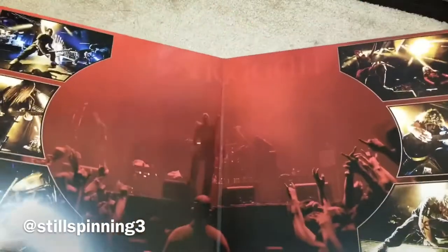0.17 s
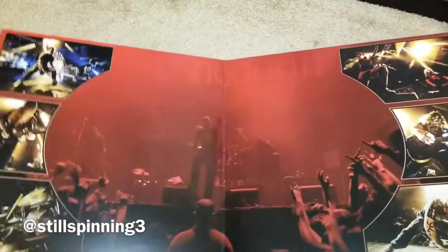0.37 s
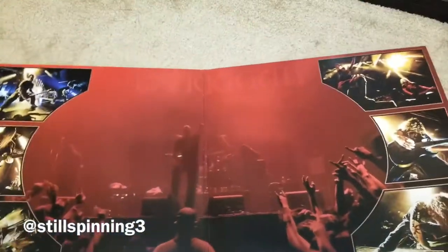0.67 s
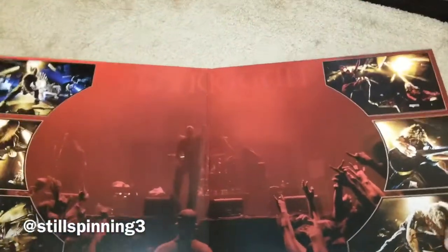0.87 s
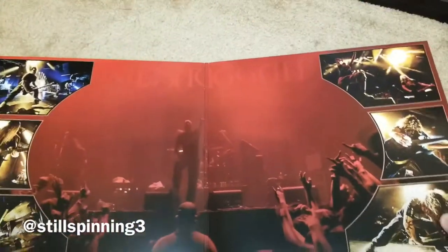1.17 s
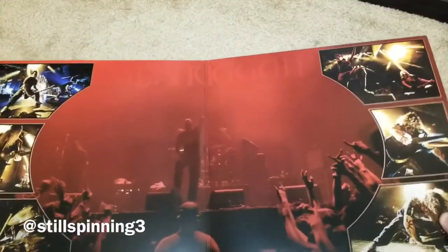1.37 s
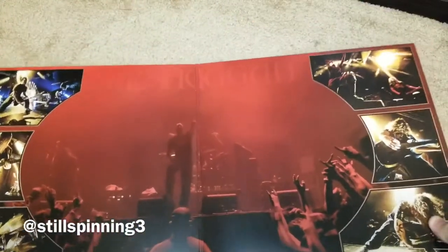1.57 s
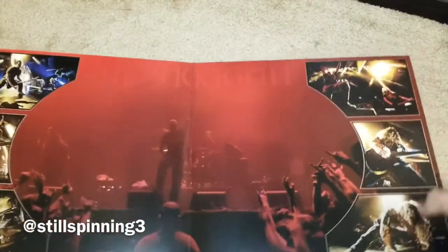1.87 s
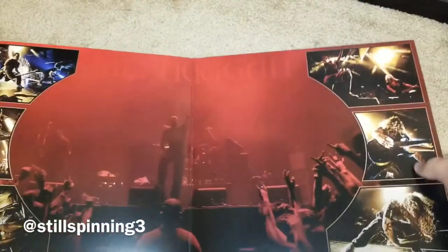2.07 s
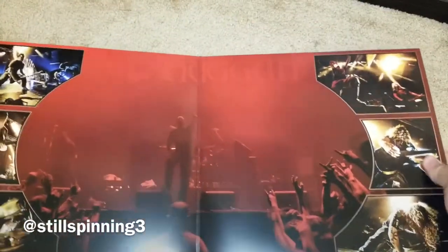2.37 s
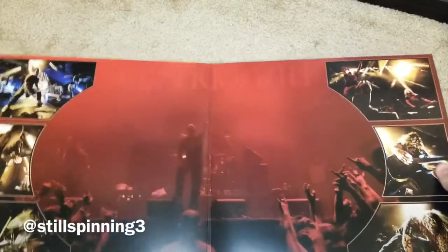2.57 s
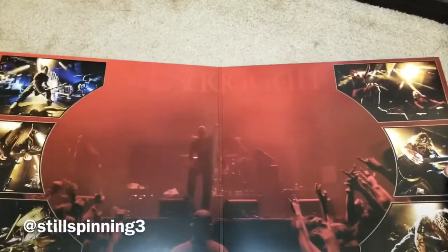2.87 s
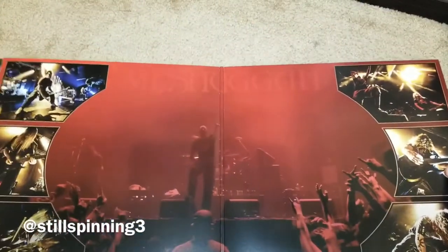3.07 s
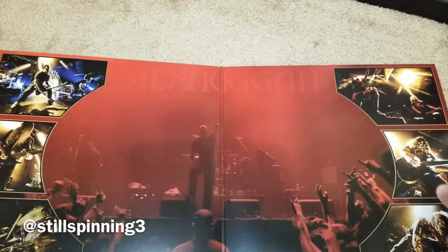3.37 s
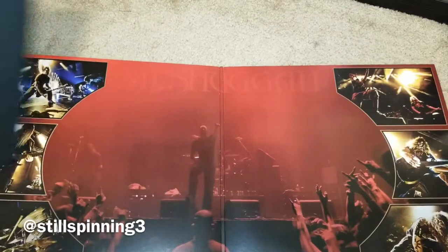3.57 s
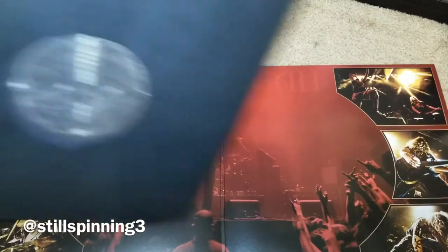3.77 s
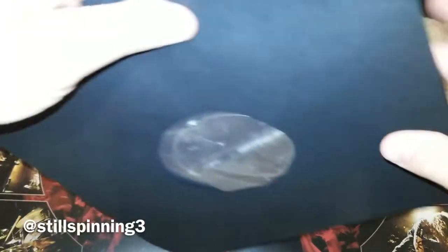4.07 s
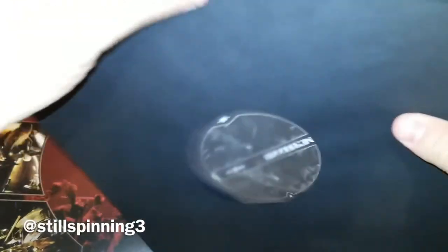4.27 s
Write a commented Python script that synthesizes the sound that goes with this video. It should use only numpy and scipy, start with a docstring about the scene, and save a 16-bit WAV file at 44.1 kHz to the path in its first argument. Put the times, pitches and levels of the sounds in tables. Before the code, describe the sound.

Close stereo sound of hands on stiff hollow card: brief dry strokes, low flexing thumps, small paper clicks. A sharp snap and knock come before the middle, then a stronger clustered knock and a breathy two-part paper slide. Things quieten to a faint room tone, with a few tiny taps, before a moderate rustle with light clicks ends it. Dry, small room.

```python
"""A cardboard gatefold jacket is handled on a carpet close to a stereo microphone in a quiet, damped room.
At first fingers stroke and knock the board (shaped noise, decaying sines), which flexes and thumps; paper snaps
(filtered noise bursts). The hardest knocks fall near 2.5 s; at 2.6-3.1 s a paper sleeve slides out (noise under a
level curve). Quieter touches follow; at 4.0-4.3 s the sleeve is turned, with more snaps and knocks.
Throughout, scrapes sing in the hollow jacket, the room answers snaps and knocks, and a faint room tone lasts."""
import sys
import numpy as np
from scipy import signal
from scipy.fft import rfft, irfft, next_fast_len
from scipy.io import wavfile
from scipy.ndimage import uniform_filter1d, map_coordinates

SR = 44100
rng = np.random.default_rng(int(sys.argv[2]) if len(sys.argv) > 2 else 0)


def voltage_ratio(decibels):
    """Convert decibels (scalar or array-like) to amplitude ratios, 20 dB per decade."""
    exponent = np.asarray(decibels, float) / 20
    return 10 ** exponent


def digitize_waveform(pressure):
    """Quantize a signal to 16-bit integers and store it at the path in sys.argv[1].

    Rows of a 2-D input are taken as channels; values are limited to [-1, 1].
    """
    field = np.atleast_2d(pressure).T
    bounded = np.clip(field, -1, 1)
    quanta = np.round(bounded * 32767).astype(np.int16)
    wavfile.write(sys.argv[1], SR, quanta)


N = 195495

# Lasting contact of paper and board. Each row: time in seconds, rubbing in dB, fine hiss in dB.
SLIDE_CURVE = [(0.0, -57, -58.5), (0.146, -58, -70), (0.192, -80, -98), (0.511, -58.5, -66),
               (0.665, -71.5, -74), (0.8, -57.5, -68.5), (1.127, -61.5, -63), (1.269, -69, -73.5),
               (1.56, -60.5, -71), (2.03, -76, -68.5), (2.41, -57.5, -61.5), (2.58, -56, -64),
               (2.63, -44.5, -48.5), (2.696, -40.5, -42.5), (2.83, -44.5, -46), (2.961, -39.5, -36),
               (3.111, -52, -52.5), (3.149, -64, -61.5), (3.35, -67.5, -71.5), (3.45, -91, -83.5),
               (3.78, -71.5, -67), (3.941, -70, -70), (4.091, -52, -54), (4.21, -49.5, -46),
               (4.288, -64, -65.5), (4.432, -64.5, -72.5)]
# Finger strokes. Each row: peak in seconds, rise in seconds, fall in seconds, rubbing in dB, fine hiss in dB.
FINGER_STROKES = [(0.346, 0.15, 0.11, -42, -47.5), (0.695, .02, 0.13, -68, -57),
                  (0.755, 0.078, 0.053, -49.5, -56.5), (0.866, .1, 0.13, -65, -57.5),
                  (0.912, .1, 0.079, -52, -56.5), (0.995, 0.02, 0.11, -55, -64),
                  (1.311, 0.035, 0.17, -61.5, -71), (1.447, 0.077, 0.067, -60, -63),
                  (1.612, 0.029, 0.067, -41, -54.5), (1.694, 0.068, 0.11, -51, -55),
                  (1.846, 0.1, 0.11, -52, -56), (1.957, 0.12, 0.14, -52.5, -60.5),
                  (2.07, 0.091, .1, -55, -60), (2.097, .025, 0.24, -52, -58),
                  (2.289, 0.11, 0.037, -52, -60.5), (2.438, 0.015, 0.11, -41, -40),
                  (2.481, 0.037, 0.051, -32, -39)]
# Squeezes and shifts of the grip. Each row: peak in seconds, rise in seconds, board flexing in dB,
# hollow pocket in dB, thumping in dB.
GRIP_SHIFTS = [(0.134, 0.098, -67, -59.5, -59.5), (0.333, 0.072, -48, -48, -80),
               (0.513, 0.042, -55, -61.5, -60), (0.613, 0.055, -52.5, -70, -47),
               (0.722, 0.036, -44.5, -49.5, -43.5), (0.766, 0.03, -37.5, -45, -35.5),
               (0.815, 0.078, -53, -59, -48), (0.914, 0.044, -49.5, -51, -51),
               (0.999, 0.044, -56, -54.5, -52.5), (1.301, 0.086, -55.5, -63, -78),
               (1.37, 0.028, -64, -64, -56), (1.449, 0.08, -59.5, -59.5, -75),
               (1.612, 0.028, -38.5, -40.5, -43), (1.688, 0.047, -50, -48.5, -44),
               (1.842, .04, -54, -52.5, -53), (1.971, 0.077, -53.5, -55.5, -60),
               (2.099, 0.022, -53, -43.5, -42), (2.298, 0.05, -49, -61, -77),
               (2.42, 0.076, -54, -55, -83.5), (2.481, 0.043, -40, -37, -52), (2.545, 0.095, -52, -53, -52),
               (2.628, 0.11, -50, -58, -45.5), (2.987, 0.085, -56.5, -84, -50.5),
               (3.124, 0.042, -56, -54, -51), (3.27, 0.13, -67, -71, -61),
               (3.585, 0.066, -69.5, -72.5, -58), (3.817, 0.027, -54.5, -71.5, -65),
               (4.09, 0.12, -77, -57, -65), (4.16, 0.16, -52.5, -52, -54)]
# Weight of the hands between grips. Each row: time in seconds, board flexing in dB.
HOLD_CURVE = [(0.0, -71), (0.25, -69.5), (0.6, -72), (1.2, -63.5), (1.55, -82), (2.2, -57.5), (2.74, -60),
              (2.9, -73), (3.1, -68.5), (3.45, -86.5), (3.95, -82), (4.25, -76), (4.432, -69)]
# Edge scrapes inside the jacket. Each row: peak in seconds, rise in seconds, fall in seconds, level in dB.
EDGE_SCRAPES = [(0.05, 0.37, .15, -66.5), (0.134, 0.055, 0.035, -51), (0.79, 0.16, 0.2, -50.5),
                (2.24, 0.12, .2, -61), (2.41, 0.22, .08, -51), (3.75, 0.33, 0.26, -74),
                (4.08, 0.12, 0.19, -54.5)]
# Resonances of the hollow jacket. Each row: centre in Hz, width in Hz, gain in dB (applied twice as
# narrow as one resonance: the curve is squared before the gain).
HOLLOW_RESONANCES = [(424, 82, -3), (1009, 190, -5)]
# Paper snaps. Each row: start in seconds, nominal peak in dB, centre in Hz, bright edge over body in dB,
# left over right in dB.
PAPER_SNAPS = [(0.6887, -47, 6520, -15, 9), (0.7172, -36, 2380, -2, -4), (0.8016, -41, 2010, -29, 14),
               (0.9143, -38, 3280, -16, 5), (0.9876, -46, 2150, -24, -14), (1.285, -41.5, 1620, -29, 5),
               (1.604, -39, 4000, -30, 0), (1.609, -19, 4900, -37, 5), (1.6507, -37.5, 1630, -23, -20),
               (1.685, -25, 4200, -13, 5), (1.8155, -39, 3970, -34, 10.5), (2.0911, -44.5, 4370, -28, -26),
               (2.0976, -37.5, 2670, -19, 8), (2.2175, -41, 2660, -25, -3), (2.2939, -27.5, 2500, -28, 5),
               (2.4343, -32, 2970, 0, 3), (2.4723, -18.5, 2850, -24.5, 4), (2.617, -26.5, 3120, -28, 2.5),
               (3.1178, -41.5, 5130, -13.5, -13), (3.153, -48, 1190, -15, 5), (3.192, -55, 2200, -20, 14),
               (3.2849, -52.5, 1800, -27, 28), (3.808, -47, 1200, -17, -2), (4.2, -32, 6770, -11, 3),
               (4.3068, -42, 8000, 15.5, 1), (4.334, -40.5, 3300, 2.5, 16), (4.3637, -40, 2820, -6, -8),
               (4.3715, -50, 3160, 3, 14), (4.3994, -45.5, 4400, 2, -8)]
# Knocks on the board. Each row: start in seconds, level in dB, pitch in Hz.
BOARD_KNOCKS = [(0.114, -45.5, 1070), (0.318, -30, 670), (0.594, -39, 590), (0.61, -43, 75),
                (0.63, -38, 85.5), (0.691, -36, 444), (0.716, -30.5, 378), (0.729, -27.5, 414),
                (0.756, -22.5, 247), (0.77, -27, 68), (0.776, -32, 330), (0.912, -34.5, 355),
                (0.986, -49, 345), (1.286, -47, 383), (1.574, -34, 750), (1.606, -25.5, 330),
                (1.674, -33, 1040), (2.089, -29.5, 340), (2.278, -35, 454), (2.296, -33.5, 395),
                (2.471, -19, 300), (2.482, -13, 310), (2.5, -13, 296), (2.542, -26.5, 470),
                (2.582, -33.5, 250), (3.036, -31.5, 344), (3.115, -29.5, 465), (3.115, -54, 75),
                (3.152, -34.5, 720), (3.386, -53.5, 610), (3.572, -48, 243), (3.807, -42, 170),
                (4.135, -36, 250), (4.138, -35, 59.7), (4.14, -29.5, 636), (4.2, -41, 100),
                (4.244, -35, 630), (4.289, -45, 264), (4.368, -54, 630), (4.398, -44, 640)]
# Noise colours: rubbing, fine hiss, flexing board, air between the boards, thumps, room tone.
# Each row: frequency in Hz, relative density in dB per Hz.
RUB_COLOUR = [(530, -27.5), (900, -17.5), (1340, -4), (1720, -3), (2040, 0), (2650, -3.5), (3750, -2.5),
              (5470, -8), (6060, -7.5), (8500, -27), (11000, -28), (18700, -120)]
HISS_COLOUR = [(5000, -9), (7000, 1), (9500, -3), (11700, 2), (13500, 2.5), (15900, 0), (16100, -84)]
BOARD_COLOUR = [(120, -4.5), (170, -14), (240, -7), (300, -7), (430, -5.5), (600, -11), (800, -8.5),
                (1100, -41)]
POCKET_COLOUR = [(600, -14), (800, -8), (950, -4), (1050, -1.5), (1200, -1.5), (1500, -2.5), (2000, -34.5)]
THUMP_COLOUR = [(20, -30), (35, -32), (55, 4.5), (70, -0.5), (110, 1), (150, -5.5), (200, -23), (300, -64)]
ROOM_TONE_COLOUR = [(18, -76), (30, -51), (124, 3.5), (152, -0.5), (198, -16), (318, -6), (551, -21),
                    (1010, -6.5), (1150, -33), (1890, -19.5), (9600, -27.5), (13900, -16), (15800, -13)]
# Direct sound. Each row: frequency in Hz, share of power common to both ports.
DIRECT_SHARE = [(40, 0.94), (130, 0.75), (300, 0.95), (1000, 0.28), (3000, 0.085), (8000, 0.05),
                (15000, 0.12)]
# Room decay. Each row: frequency in Hz, T60 in seconds.
ROOM_T60 = [(200, 0.34), (2000, 0.46), (10000, 0.017)]
# Port balance. Each row: frequency in Hz, left over right in dB.
PORT_BALANCE = [(40, -3.5), (130, 1), (400, -1), (1000, 1.5), (4000, 0), (8000, 2), (15000, 6)]

LEAD_S = 12 / 44100  # the left port hears the jacket first
SWELL_DB = 20  # gained over the rise, lost over the fall
RELEASE_RATIO = 1.59  # a grip lets go this many times slower than it tightens
HOLD_POCKET_DB, REST_THUMP_DB = -8, -68.5  # pocket over flexing; steady faint thumping
SNAP_T60_S, SPIKE_DB, SPIKE_T60_S = 0.0078, 3, 0.0014  # burst; its first instant stands above it
KNOCK_T60_S, KNOCK_CYCLES = 0.011, 4.1  # lower knocks ring longer: this many cycles are added
ROOM_ECHO_DB, ROOM_TONE_DB = -11.5, -68.5


def unit(x):
    """Scales to rms 1."""
    return x / np.sqrt(np.mean(x ** 2) + 1e-20)


def along(points, hz):
    """Reads (Hz, value) points on a log frequency axis."""
    f, v = np.transpose(points)
    return np.interp(np.log(hz + 1), np.log(f + 1), v)


def wobble(rate_hz):
    """Draws a smooth random curve with rate_hz knots a second."""
    knots = rng.standard_normal(int(N * 200 / SR) + 4)
    return map_coordinates(knots, [np.arange(N) * min(rate_hz, 199) / SR])


def filtered(x, response):
    """Applies a complex response of frequency."""
    m = next_fast_len(N + 8192)
    hz = np.fft.rfftfreq(m, 1 / SR)
    return irfft(rfft(x, m) * response(hz), m)[..., :N]


def late(hz):
    """Delays the right port's direct sound by LEAD_S."""
    return np.array([np.ones(len(hz)), np.exp(-2j * np.pi * hz * LEAD_S)])


def curves(rows):
    """Interpolates each column after the time to one value per sample."""
    s, *cols = np.transpose(rows)
    return [np.interp(np.arange(N) / SR, s, c) for c in cols]


def swells(peak_s, rise_s, fall_s, *levels_db):
    """One gain curve per level column: events climb and drop straight in dB, powers adding."""
    t = np.arange(N)[::16, None] / SR - peak_s  # every 16th sample
    before = -t / np.maximum(rise_s, .005)
    after = t / np.maximum(fall_s, .005)
    shape = voltage_ratio(-SWELL_DB * np.where(t < 0, before, after))
    return [np.repeat(np.sqrt(shape ** 2 @ voltage_ratio(db) ** 2), 16)[:N] for db in levels_db]


def friction(spectrum, grit_db, patchy_db, flutter_db, flutter_hz):
    """Stereo rubbing of rms 1: fibres catch with uneven strength, heard partly straight, partly scattered."""
    grit = np.clip(rng.standard_normal(N), -2.5, 2.5)
    catches = rng.standard_normal((3, N)) * voltage_ratio(grit_db * grit)

    # the grain of the paper shifts: smooth random gains over frequency and time
    z = signal.stft(catches, nperseg=512)[2]
    field = uniform_filter1d(rng.standard_normal(z.shape[1:]), size=4, axis=0)
    field = uniform_filter1d(field, size=10, axis=1)
    catches = signal.istft(z * voltage_ratio(patchy_db * unit(field)), nperseg=512)[1][:, :N]

    def share(hz):
        return np.clip(along(DIRECT_SHARE, hz), 0, 1)

    def colour(hz):
        return voltage_ratio(along(spectrum, hz))

    straight = filtered(catches[0], lambda hz: colour(hz) * np.sqrt(share(hz)) * late(hz))
    scattered = filtered(catches[1:], lambda hz: colour(hz) * np.sqrt(1 - share(hz)))
    return unit((straight + scattered) * voltage_ratio(flutter_db * wobble(flutter_hz)))


def sliding(stick):
    """Paper rubs and hisses on board: noise following the slide and the finger strokes."""
    rub_db, hiss_db = curves(SLIDE_CURVE)
    rub_strokes, hiss_strokes = swells(*np.transpose(FINGER_STROKES))
    rub = friction(RUB_COLOUR, grit_db=2.0, patchy_db=2.9, flutter_db=0.8, flutter_hz=75.1)
    rub *= np.hypot(voltage_ratio(rub_db), rub_strokes) * voltage_ratio(0.35 * stick)
    hiss = friction(HISS_COLOUR, grit_db=3.0, patchy_db=1.0, flutter_db=0.5, flutter_hz=88.5)
    hiss *= np.hypot(voltage_ratio(hiss_db), hiss_strokes) * voltage_ratio(0.4 * stick)
    return rub + hiss


def gripping(stick):
    """The grip flexes the board, works the air in the hollow pocket and thumps: three noise bands."""
    hold_db, = curves(HOLD_CURVE)
    peak_s, rise_s, *levels_db = np.transpose(GRIP_SHIFTS)
    flexes, pockets, thumps = swells(peak_s, rise_s, RELEASE_RATIO * rise_s, *levels_db)
    flex = friction(BOARD_COLOUR, grit_db=6.5, patchy_db=0.2, flutter_db=4.0, flutter_hz=39.56)
    flex *= np.hypot(voltage_ratio(hold_db), flexes) * voltage_ratio(1.52 * stick)
    pocket = friction(POCKET_COLOUR, grit_db=1.5, patchy_db=1.3, flutter_db=1.36, flutter_hz=38.5)
    pocket *= np.hypot(voltage_ratio(hold_db + HOLD_POCKET_DB), pockets) * voltage_ratio(0.53 * stick)
    thump = friction(THUMP_COLOUR, grit_db=1.5, patchy_db=2.15, flutter_db=0.0, flutter_hz=22)
    thump *= np.hypot(voltage_ratio(REST_THUMP_DB), thumps)
    return flex + pocket + thump


def handling():
    """Sliding and gripping share one stutter; only the thumps are free of it."""
    stick = wobble(30.44)
    return sliding(stick) + gripping(stick)


def snaps():
    """Each crease lets go at once: a burst around its own pitch with a bright edge, then a weaker rattle."""
    out, t = np.zeros((2, N + SR)), np.arange(SR // 10) / SR
    hz = np.fft.rfftfreq(len(t), 1 / SR)
    for s, db, centre_hz, treble_db, pan_db in PAPER_SNAPS:
        fade = voltage_ratio(-60 * t / SNAP_T60_S)
        fade += voltage_ratio(-15 - 60 * t / .05)  # rattle
        fade += voltage_ratio(SPIKE_DB - 60 * t / SPIKE_T60_S)
        burst = rfft(rng.standard_normal((2, len(t))) * fade)
        sheet = centre_hz ** 2 / (centre_hz ** 2 - hz ** 2 + .5j * hz * centre_hz)
        sheet = sheet * 1j * hz / (1200 + 1j * hz)  # thin paper: no bass
        bright = (1j * hz / (9000 + 1j * hz)) ** 3
        body, edge = irfft(burst * [sheet, bright], len(t))
        crack = body / np.linalg.norm(body) + voltage_ratio(treble_db) * edge / np.linalg.norm(edge)
        crack *= np.linalg.norm(fade) / 2 * (t < .08)  # noise peaks at about twice its rms
        pan = voltage_ratio([[pan_db / 2], [-pan_db / 2]])
        out[:, round(s * SR):][:, :len(t)] += voltage_ratio(db) * crack * pan
    return out[:, :N]


def knocks():
    """A finger or an edge pushes the board: a few dull cycles with a woody overtone."""
    out, t = np.zeros(N + SR), np.arange(SR // 8) / SR
    for s, db, hz in BOARD_KNOCKS:
        fade = voltage_ratio(-60 * t / (KNOCK_T60_S + KNOCK_CYCLES / hz))
        fade *= 1 - np.exp(-t / .002)  # soft onset
        overtone = 0.41 * np.sin(2 * np.pi * 2.6 * hz * t) * voltage_ratio(-60 * t / 0.017)
        ring = np.sin(2 * np.pi * hz * t) + overtone
        out[round(s * SR):][:len(t)] += voltage_ratio(db) * fade * ring
    return out[:N]


def scrapes():
    """An edge scrapes in the half-open jacket: fibre noise through its narrow resonances."""
    gain, = swells(*np.transpose(EDGE_SCRAPES))

    def ring(f):
        return sum(voltage_ratio(db) * (1j * f * w / (c * c - f * f + 1j * f * w)) ** 2
                   for c, w, db in HOLLOW_RESONANCES)

    fibres = friction(POCKET_COLOUR, grit_db=7, patchy_db=3.0, flutter_db=3.5, flutter_hz=30.26)
    return gain * unit(filtered(fibres, ring))


def room(x):
    """Convolves with a decaying noise tail: each frequency of the answer dies at its own speed."""
    hz, t, z = signal.stft(rng.standard_normal((2, SR // 3)), SR, nperseg=256)
    decay = voltage_ratio(-60 * t / along(ROOM_T60, hz)[:, None])
    tail = signal.istft(z * decay, SR, nperseg=256)[1]
    tail = tail / np.linalg.norm(tail[0])
    delayed = np.pad(x, (100, 0))  # samples
    return signal.fftconvolve(delayed[None], tail, axes=1)[:, :N]


def room_tone():
    """Steady noise of the room and microphone, alike at both ports only in the bass."""
    a, b = rng.standard_normal((2, N))

    def colour(hz):
        return voltage_ratio(along(ROOM_TONE_COLOUR, hz))

    def angle(hz):
        return np.arccos(.9 / (1 + (hz / 400) ** 2)) / 2  # from the correlation of the ports

    mid = filtered(a, lambda hz: colour(hz) * np.cos(angle(hz)))
    side = filtered(b, lambda hz: colour(hz) * np.sin(angle(hz)))
    return voltage_ratio(ROOM_TONE_DB) * unit(np.array([mid + side, mid - side]))


def scene():
    """Snaps and knocks reach both ports and the room; rubbing and background lie beneath."""
    hits = snaps() + knocks()
    echo = voltage_ratio(ROOM_ECHO_DB) * room(hits.mean(0))
    return handling() + filtered(hits, late) + scrapes() + echo + room_tone()


def band_limit(x):
    """A steep low-pass at the top of the band."""
    return signal.sosfilt(signal.butter(12, 16750, fs=SR, output="sos"), x)


def record(dry):
    """Stereo microphone: the left port is the brighter; small capsules lose the deep bass; the top is cut."""
    def balance(hz):
        return voltage_ratio(along(PORT_BALANCE, hz) * [[.5], [-.5]]) * (hz < 15900)

    ports = filtered(dry, balance)
    mix = filtered(ports, lambda hz: (1j * hz / (40 + 1j * hz)) ** 2)
    return band_limit(mix)


dry = scene()
out = record(dry)
digitize_waveform(out)
```